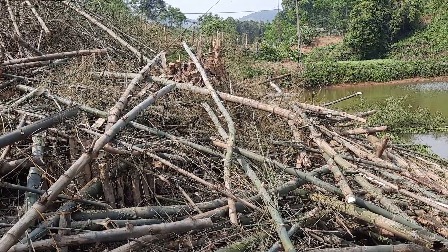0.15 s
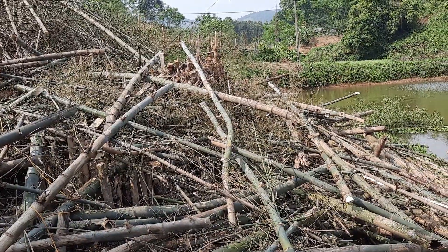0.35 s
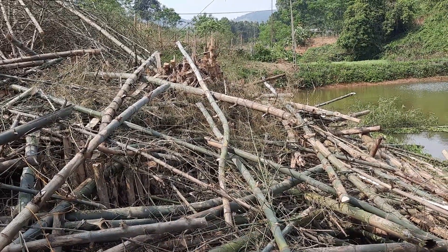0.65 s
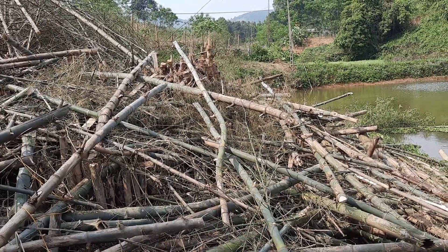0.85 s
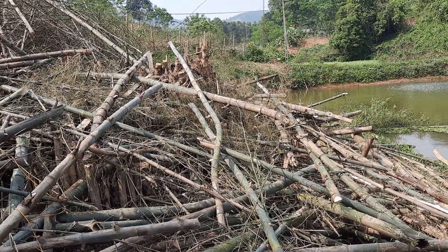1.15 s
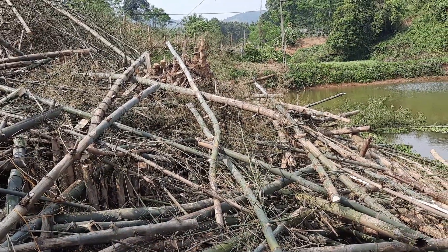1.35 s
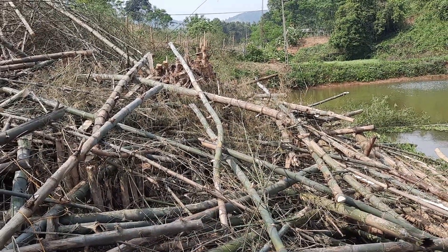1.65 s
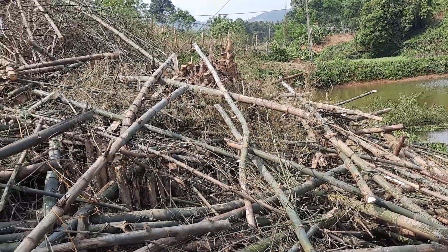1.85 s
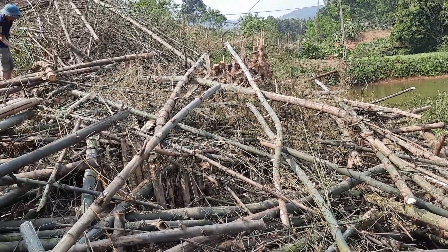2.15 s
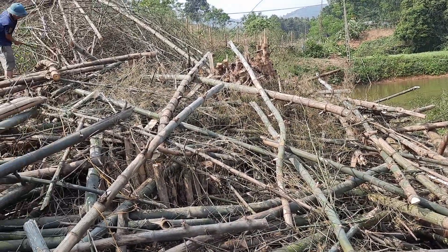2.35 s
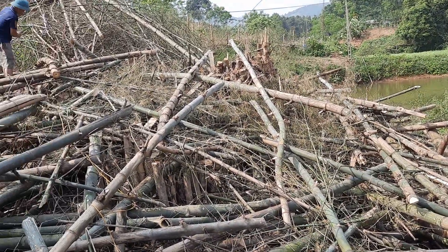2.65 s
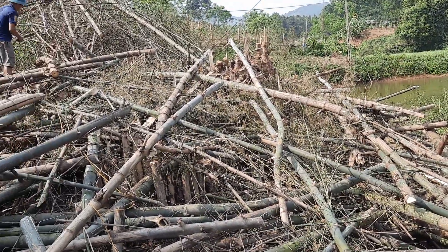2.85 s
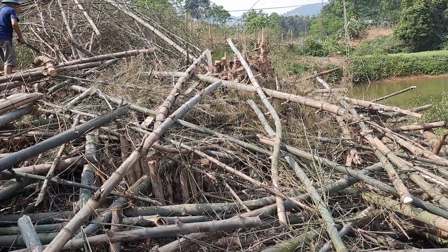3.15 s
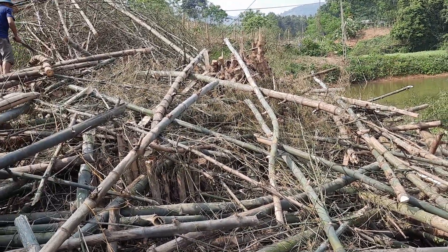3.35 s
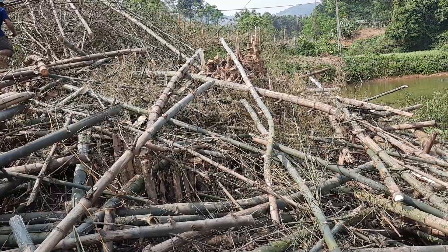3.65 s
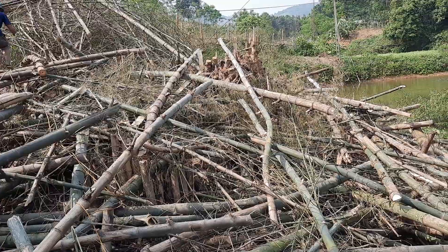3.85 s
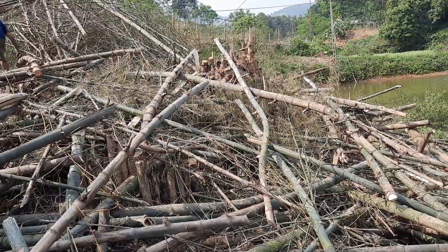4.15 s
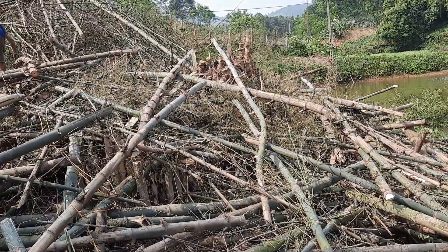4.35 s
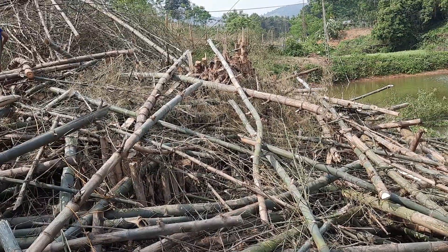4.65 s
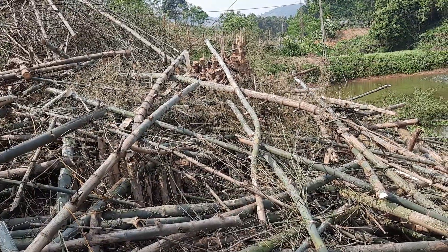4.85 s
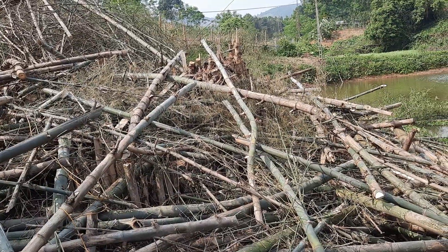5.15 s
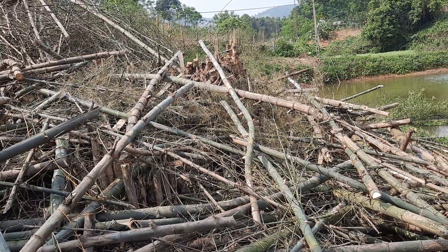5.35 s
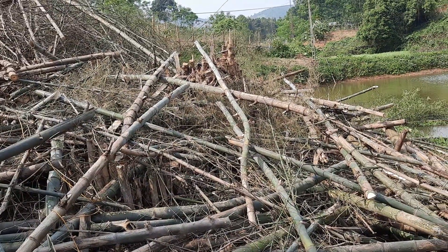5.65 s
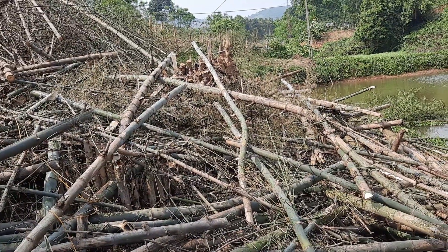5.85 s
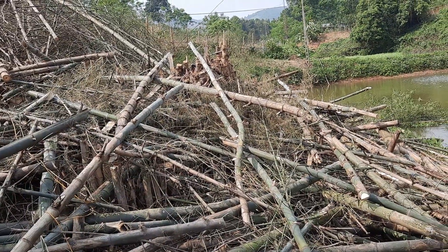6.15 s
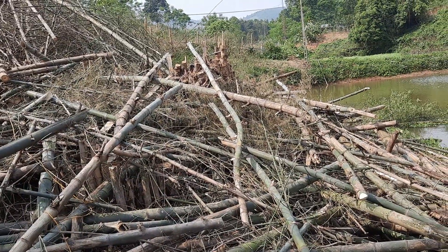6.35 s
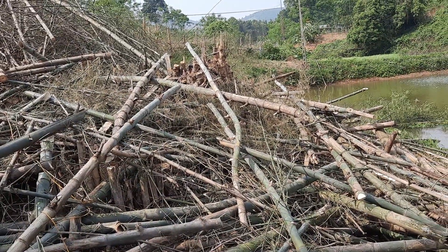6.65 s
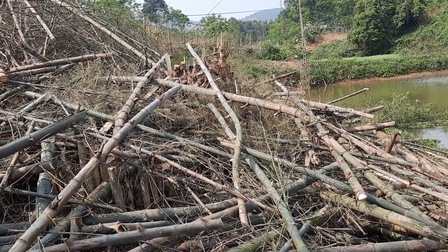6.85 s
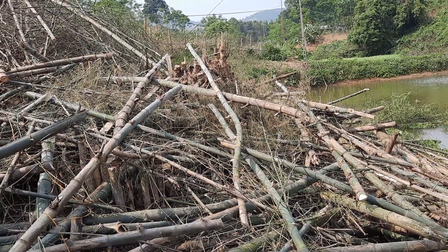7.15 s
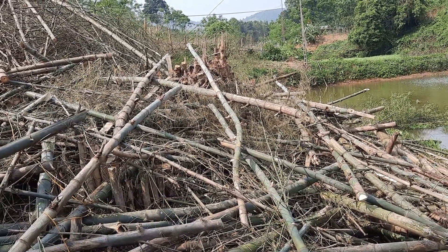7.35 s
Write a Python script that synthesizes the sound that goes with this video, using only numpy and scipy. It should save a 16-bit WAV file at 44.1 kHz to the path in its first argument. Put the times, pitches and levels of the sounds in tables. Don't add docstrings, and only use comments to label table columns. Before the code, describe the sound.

Irregular hacking at hollow bamboo in a dry heap, crisp woody cracks and short clatter, while breeze thumps softly on the microphone.

```python
import sys
import numpy as np
from scipy import signal
from scipy.fft import rfft, irfft, next_fast_len
from scipy.io import wavfile
from scipy.ndimage import uniform_filter1d

SR = 44100
rng = np.random.default_rng(int(sys.argv[2]) if len(sys.argv) > 2 else 0)


def wrap_up_sound(samples):
    columns = np.atleast_2d(samples).T
    tamed = np.clip(columns, -1, 1)
    steps = np.round(tamed * 32767).astype(np.int16)
    wavfile.write(sys.argv[1], SR, steps)


def linear_from_db(decibels):
    return 10 ** (np.asarray(decibels, float) / 20)


N = 331191
TIME = np.arange(N) / SR

# frequency in Hz, spectral density in dB.
FIELD_SPECTRUM = [(40, -15.5), (190, -12.5), (250, -5), (340, -3.5), (480, -3), (750, -7.5), (1300, -6.5),
                  (2200, -1), (4000, -2), (7500, -1.5), (11500, 0.5), (14000, -0.5), (15700, -5.5)]
FIELD_DB = -56.5

# time in seconds, level in dB.
GUST = [(0, -68.5), (0.55, -80), (1.15, -64.5), (1.55, -79.5), (1.88, -61.5), (2.25, -61.5), (2.5, -74),
        (3.0, -56.5), (3.4, -78.5), (3.75, -80.5), (4.15, -73.5), (4.88, -68.5), (5.25, -63), (5.75, -80),
        (6.35, -62.5), (6.75, -76.5), (7.15, -58), (7.5, -72.5)]
# centre in seconds, left level in dB, right level in dB,
# half length in ms.
THUMPS = [(0.356, -57.5, -45, 40), (1.847, -45, -34.5, 32.8), (2.187, -54.5, -38, 33),
          (2.322, -46.5, -33, 30.6), (2.36, -40.5, -41.5, 50.7), (2.68, -51.5, -46, 33.6),
          (2.731, -48.5, -47.5, 26.6), (2.78, -40.5, -38, 15.4), (3.277, -50, -49, 36),
          (4.31, -53, -48.5, 15.3), (5.24, -47.5, -49, 31), (5.449, -44.5, -44, 31.6),
          (7.142, -40.5, -36, 21.4)]
# centre in seconds, level in dB, half length in ms.
EDDIES = [(0.31, -47.5, 25), (0.41, -58, 51), (0.751, -45.5, 105.3), (0.978, -54, 24.6), (1.102, -52, 39),
          (1.27, -53, 163), (1.424, -56, 31.4), (1.655, -43, 33.6), (1.696, -37, 37.3), (1.79, -48, 46),
          (1.969, -51.5, 42.3), (2.1, -46.5, 80), (2.38, -32.5, 8.74), (2.845, -45.5, 34.6),
          (2.955, -42, 45.7), (3.125, -44, 11.8), (3.236, -52.5, 79), (3.97, -65.5, 49), (4.439, -49.5, 42),
          (4.57, -56.5, 46), (4.768, -51, 63.6), (5.17, -44, 28), (6.232, -48.5, 67), (7.07, -54, 55),
          (7.19, -53.5, 44), (7.266, -51.5, 41.5), (7.5, -51.5, 16.2)]
# centre in seconds, left level in dB, right level in dB,
# half length in ms.
FLUTTERS = [(0.23, -46, -68, 9.7), (0.435, -55.5, -70, 42), (0.789, -56, -71.5, 41),
            (1.047, -59, -76.5, 21.2), (1.644, -63.5, -77.5, 185), (1.656, -49, -60, 56.8),
            (1.85, -49.5, -54, 16.4), (1.908, -48.5, -71, 9.2), (2.03, -53.5, -80.5, 25.4),
            (2.1, -57, -68, 68), (2.194, -50.5, -54.5, 21), (2.38, -46, -51.5, 25), (2.631, -59, -67, 41),
            (2.66, -50, -50, 201.5), (2.733, -53, -65.5, 10.7), (2.85, -58.5, -63.5, 43),
            (2.933, -50, -52, 11.4), (2.95, -63, -58, 242), (2.98, -62, -69.5, 26.6),
            (4.713, -49.5, -73, 15.8), (4.97, -60.5, -62, 178), (5.445, -53, -49, 19.7),
            (5.948, -69, -58.5, 17.8), (6.69, -52, -72.5, 25.2), (6.833, -57.5, -63, 47.4),
            (7.145, -57.5, -57, 25), (7.197, -54.5, -58.5, 21), (7.31, -55, -71, 28),
            (7.355, -51, -66, 9.7), (7.467, -55, -73.5, 9.1)]
# frequency in Hz, level in dB.
THUMP_SPECTRUM = [(30, -10.5), (62, 0), (85, -1), (130, -7), (190, -16.5), (260, -25), (400, -56.5)]
# frequency in Hz, level in dB.
FLUTTER_SPECTRUM = [(150, -33), (250, -9.5), (320, 4), (410, -1.5), (510, -7), (660, -19.5), (1000, -42.5)]
SHELTER_DB = -26.5
CALM_DB, FLUTTER_DB = -74, -75
FLUTTER_SHARE = 0.468

# time in seconds, jolt of the heap in dB, force on the hollow in dB,
# force on the wall in dB.
BLOWS = [
    (0.071, -35.5, -36.5, -37),
    (1.436, -47, -56.5, -44.5),
    (2.2538, -29, -45, -32),
    (4.218, -56.5, -31.5, -38.5),
    (5.1532, -54, -33, -39),
    (6.1908, -31.5, -33.5, -38),
]
HOLLOW_FADE_DB_S, WALL_FADE_DB_S, JOLT_FADE_DB_S = 160.5, 243.5, 559
RING_LEAD_S = 0.002956
# time in seconds, peak in dB, own ring in Hz,
# edge in dB against the peak.
TEARS = [(0.0717, -19.5, 2647, -19.5), (0.0817, -31, 2570, -32), (0.0946, -26.5, 1760, -34),
         (1.438, -18, 3118, -23), (1.4454, -33.5, 2230, -29.5), (2.2538, -12.5, 3904, -18.5),
         (2.2744, -26.5, 1520, -30), (2.3195, -23, 1997, -19.5), (4.2173, -20.5, 2937, -20),
         (4.2394, -30, 1520, -24.5), (4.261, -36, 1530, -22.5), (5.1537, -19, 2133, -17),
         (5.1713, -22.5, 5700, -33), (5.211, -42.5, 2870, -13.5), (5.2374, -33, 5040, -9.5),
         (5.2581, -38.5, 5820, -24), (6.193, -19, 2340, -21), (6.2044, -23.5, 2950, -22),
         (6.2148, -20, 2400, -31.5), (6.2579, -31, 2390, -21.5)]
# time in seconds, peak in dB, # own
# ring in Hz, wall in dB against the peak, edge in dB against the peak.
TWIGS = [(0.1424, -30.5, 2770, -18.5, -28), (0.166, -27.5, 2350, -37.5, -33.5),
         (0.1673, -33, 4200, -28, -33), (0.176, -32, 2330, -33.5, -29.5), (0.2581, -38, 4110, -23.5, -19),
         (0.2908, -37.5, 5620, -29, -25.5), (1.501, -42, 2690, -25.5, -23), (2.391, -31.5, 6290, -25, -30),
         (4.088, -33, 2924, -29, -25.5), (4.4176, -32.5, 5550, -14.5, -2), (4.474, -43.5, 5900, -17, 3.5),
         (4.482, -42, 5900, -18, -0.5), (4.492, -49.5, 5900, -21, -2.5), (5.1456, -34, 2800, -14, -30),
         (5.3107, -36.5, 3470, -23.5, -25.5), (5.3504, -40, 3330, -10.5, -19.5),
         (5.395, -42, 5120, -24, -20), (5.415, -34.5, 2850, -14, -26.5), (5.432, -32, 2083, -7.5, -27),
         (6.395, -50.5, 2450, -14.5, -14), (7.441, -39, 5000, -24.5, -4), (7.45, -41, 5570, -28, -13.5)]
TWIG_HOLLOW_DB = -28
# frequency in Hz, width in Hz, level in dB.
FIBRE = [
    [(1710, 300, 8.5), (2666, 83, 22), (4200, 1700, 3), (5110, 176, 14.5), (5400, 200, 11.5),
     (7700, 390, -23.5)],
    [(1760, 104, 6.5), (2330, 163, 18), (3050, 290, -19), (4850, 110, 12.5), (5300, 330, 11),
     (6560, 590, 0)],
    [(1500, 81, 11.5), (1910, 510, 4), (4200, 180, -14.5), (4543, 330, 3), (5900, 77, -2), (6710, 600, 0),
     (8197, 570, 1)],
    [(1274, 140, 2.5), (1520, 77, 8.5), (2150, 137, 5.5), (2950, 410, -0.5), (4240, 224, -9.5),
     (5300, 194, 1), (5800, 190, -5.5)],
    [(1723, 240, -4.5), (2073, 109, 13), (2950, 420, -10.5), (3873, 112, 4), (4750, 234, -7.5),
     (5900, 150, 1.5), (7820, 230, 0.5)],
    [(1706, 136, 3.5), (2690, 410, 7), (2806, 133, 8.5), (3860, 79, 6.5), (4696, 456, 3.5),
     (5820, 170, -3.5)],
]
# frequency in Hz, width in Hz, level in dB.
SNAP = [(1260, 1540, -27), (4030, 2680, -9)]
# frequency in Hz, width in Hz, level in dB.
HOLLOW = [(195, 103, -12), (288.1, 59, -2), (347, 86, 0), (436.2, 60, 1), (516.2, 57.5, -6)]
# frequency in Hz, width in Hz, level in dB.
WALL = [(669.3, 69, -9), (775.6, 52.2, -2.5), (907.4, 132.7, -2), (1044.5, 79.5, -2.5)]
# frequency in Hz, width in Hz, level in dB.
EDGE = [(10520, 4000, -12), (12203, 480, -6)]
# frequency in Hz, width in Hz, level in dB.
HEAP = [(1530, 1370, -2.5), (2110, 392, 4.5), (2745, 588, -1), (4200, 930, -3.5), (5620, 1130, -14),
        (7260, 500, -9.5)]
# start in seconds, length in seconds, level in dB,
# hollow in dB against the level, wall in dB against the level.
SLIDES = [(0.105, 0.066, -51, -1, 1), (0.21, 0.178, -56.5, -3, -6.5), (1.447, 0.067, -51, -7.5, -4),
          (2.265, 0.0748, -44.5, -1, -3.5), (2.386, 0.0854, -54, -8.5, -8.5),
          (4.087, 0.058, -56, -20.5, -7.5), (4.227, 0.0625, -49, 11.5, 3), (4.328, 0.24, -60, -3, -3.5),
          (5.175, 0.069, -41.5, 2.5, -3), (5.312, 0.0694, -51.5, -6.5, -1.5), (5.413, 0.0206, -51, -2, -2),
          (5.45, 0.0827, -59, 4, -4.5), (5.699, 0.098, -62, -9, -12.5), (6.205, 0.0673, -43.5, -3.5, -3),
          (6.317, 0.089, -57, -11.5, -11.5), (6.749, 0.177, -61, -6, -3)]
SLIDE_RISE_DB_S, SLIDE_SAG_DB_S, SLIDE_FALL_DB_S = 904, 25, 361.5

# time in seconds, peak in dB, stronger ring in Hz, weaker ring in Hz.
TICKS = [(0.0738, -20, 2537, 5750), (0.0795, -23.5, 3940, 1206), (0.0831, -26, 2740, 5740),
         (0.088, -41, 1400, 2650), (0.0906, -40, 1850, 3210), (0.0956, -30, 2270, 3170),
         (0.0986, -33, 1740, 3080), (0.168, -26.5, 2306, 4100), (0.1704, -32.5, 2360, 4110),
         (0.174, -33, 2500, 3470), (0.1792, -40, 2450, 3700), (1.4347, -37.5, 2450, 4780),
         (1.4388, -22, 3034, 5300), (1.4431, -28, 2220, 5640), (1.4465, -38, 2240, 1210),
         (1.4517, -40, 2150, 3250), (2.252, -20.5, 4200, 2540), (2.2548, -28.5, 3760, 2690),
         (2.2577, -17, 3700, 6830), (2.2616, -24.5, 4170, 1550), (2.264, -24.5, 1410, 3830),
         (2.2723, -30, 1210, 4220), (2.2765, -35, 1210, 3770), (2.281, -28.5, 1210, 2070),
         (2.3234, -37.5, 2020, 2930), (2.3292, -36, 2000, 4110), (2.3911, -35, 3790, 6050),
         (2.3946, -32, 3270, 1660), (4.2168, -31.5, 3260, 5400), (4.2206, -23.5, 2866, 5330),
         (4.2243, -34, 1890, 2820), (4.227, -32.5, 2110, 1210), (4.2407, -41.5, 1490, 2950),
         (4.418, -36.5, 5640, 7200), (4.421, -30, 5670, 4900), (5.1504, -32, 2810, 3850),
         (5.1535, -26.5, 5450, 2135), (5.1567, -28.5, 5770, 3260), (5.1615, -33.5, 2880, 1210),
         (5.167, -28, 1210, 5400), (5.1731, -27, 5710, 3260), (5.1758, -37, 2950, 5840),
         (5.2145, -41.5, 2860, 5470), (5.2252, -36, 2910, 4220), (5.2385, -31.5, 5040, 6200),
         (6.1923, -28, 5620, 2880), (6.1968, -25.5, 2420, 3840), (6.2021, -28, 2330, 4130),
         (6.2045, -21, 2980, 5900), (6.2079, -33.5, 3060, 4590)]
TICK_DB, TICK_WEAK_DB = 3, -3
TICK_CYCLES, TICK_RISE_S = 2.6, .00012
# start in seconds, length in seconds, level in dB, resonance in Hz.
SCRAPES = [(0.175, 0.019, -45.5, 2534), (1.475, 0.0094, -48, 2490), (1.5, 0.00997, -46.5, 2726),
           (2.251, 0.016, -37.5, 1554), (2.261, 0.0169, -35, 958), (2.324, 0.0152, -38.5, 1994),
           (2.441, 0.0283, -54, 2164), (2.469, 0.0284, -52, 1500), (2.487, 0.0173, -61.5, 2910),
           (2.518, 0.0164, -55.5, 2060), (0.162, .008, -45.5, 4200), (0.288, 0.0081, -56, 5970),
           (0.341, .012, -55.5, 3750), (0.381, 0.044, -64.5, 2624), (4.419, .01, -52, 5800),
           (5.413, 0.0152, -43, 960), (5.164, 0.028, -38.5, 903), (6.302, 0.049, -60, 1595),
           (0.095, .01, -41, 1677), (5.18, 0.041, -47.5, 566.3), (4.271, 0.0282, -59.5, 6310),
           (0.083, .012, -41.5, 400.5), (1.436, 0.0274, -45, 857), (2.285, .02, -46.5, 631),
           (5.206, 0.023, -46.5, 7740), (4.227, .02, -38.5, 917), (4.232, .013, -53, 2990),
           (4.433, 0.0125, -50.5, 5600), (4.473, 0.031, -57, 5900), (5.157, 0.0109, -40, 2880),
           (5.215, 0.016, -52, 2890), (5.315, 0.0279, -54.5, 951), (5.394, 0.0185, -53.5, 5160),
           (5.424, 0.0183, -43, 1690), (6.19, 0.019, -42, 519.4), (6.272, 0.023, -53.5, 5400),
           (6.398, 0.0374, -57.5, 2434), (6.441, 0.0224, -58.5, 2520), (7.418, 0.0121, -59, 2394),
           (7.437, .006, -48.5, 5030), (7.438, 0.0083, -57.5, 3120), (7.445, .014, -50, 5210),
           (7.448, 0.0092, -59.5, 5850)]
SCRAPE_WIDTH = 0.0535

# time in seconds, level in dB.
DRONE = [(5.9, -100), (6.4, -81), (7.5, -81)]
DRONE_HZ = 219
# time in seconds, pitch in Hz, level in dB.
BIRD = [
    (6.745, 1545, -88),
    (6.758, 1555, -68),
    (6.775, 1565, -70),
    (6.79, 1565, -82),
    (6.803, 1575, -69),
    (6.87, 1580, -74),
    (6.89, 1580, -88),
]

PORT_LAG = 14
# frequency in Hz, level in dB.
SHADOW = [(300, 0.5), (700, -8), (1600, 0), (3500, 0)]
# frequency in Hz, level in dB.
RIGHT_PORT = [(300, -1.5), (650, 6), (1200, 3), (1700, 2.5), (2200, -2.5), (2800, -2), (4500, 0), (6500, 1),
              (7800, 2.5), (9700, -26), (12000, -6.5), (15000, -12)]


def unit(x):
    return x / np.sqrt(np.mean(x ** 2, axis=-1, keepdims=True))


def colour(x, points):
    hz, db = np.transpose(points)
    size = next_fast_len(N + 4096)
    bins = np.arange(size // 2 + 1) * SR / size + 1
    gain = linear_from_db(np.interp(np.log(bins), np.log(hz), db))
    return irfft(rfft(x, size) * gain, size)[..., :N]


def ring(x, modes):
    out, power = 0, 0
    for k, (hz, width, db) in enumerate(modes):
        width = max(width, 20)
        b, a = signal.iirpeak(hz, hz / width, SR)
        out = out + (-1) ** k * linear_from_db(db) * signal.lfilter(b, a, x)
        power += linear_from_db(db) ** 2 * np.pi * width / SR
    return out / np.sqrt(power)


def walk(rate):
    fine = 8
    steps = rng.standard_normal((2, int(N / SR * rate) + 2))
    steps = np.repeat(steps, fine, axis=1)
    smooth = unit(uniform_filter1d(uniform_filter1d(steps, fine), fine))
    return np.array([np.interp(TIME * rate * fine, np.arange(len(row)), row) for row in smooth])


def grit(size, spread_db, alike):
    snap_db = spread_db * np.minimum(rng.exponential(size=size), 4.5)
    snaps = rng.standard_normal((3, size)) * linear_from_db(snap_db)
    alike = np.clip(alike, 0, 1)
    return unit(np.sqrt(alike) * snaps[0] + np.sqrt(1 - alike) * snaps[1:])


def at_ports(left, right):
    return np.array([left, colour(np.roll(right, PORT_LAG), SHADOW)])


def field():
    noise = rng.standard_normal((3, N))
    shared = np.array([noise[0], np.roll(noise[0], PORT_LAG)])
    hiss = unit(colour(noise[1:] + 0.307 * shared, FIELD_SPECTRUM))
    return hiss * linear_from_db(FIELD_DB + 0.059 * walk(6.43)[0] + 0.034 * walk(22))


def buffets(puffs, breeze_db, spectrum, rough_db):
    eddies = unit(colour(rng.standard_normal((2, 2, N)), spectrum))
    out = eddies[0] * linear_from_db(breeze_db + rough_db * walk(30))
    for s, left_db, right_db, ms in puffs:
        half = int(ms * SR / 1000)
        a, b = max(int(s * SR) - half, 0), min(int(s * SR) + half, N)
        bell = np.hanning(b - a)
        puff = unit(eddies[1, :, a:b] * bell) * np.sqrt(np.mean(bell ** 2))
        out[:, a:b] += linear_from_db(np.array([[left_db], [right_db]])) * puff
    return out


def wind():
    gust_db = np.interp(TIME, *np.transpose(GUST))
    deep = THUMPS + [(s, db + SHELTER_DB, db, ms) for s, db, ms in EDDIES]
    thumps = buffets(deep, gust_db + np.array([[SHELTER_DB + 15.5], [0]]), THUMP_SPECTRUM, 5.1)
    flutter_db = FLUTTER_DB + FLUTTER_SHARE * (gust_db - CALM_DB)
    return thumps + buffets(FLUTTERS, flutter_db, FLUTTER_SPECTRUM, 4.32)


def crack_rows():
    rows = [(s, db, hz, TWIG_HOLLOW_DB, wall_db, edge_db) for s, db, hz, wall_db, edge_db in TWIGS]
    for s, db, hz, edge_db in TEARS:
        start, _, hollow_db, wall_db = min(BLOWS, key=lambda blow: abs(blow[0] - s))
        late = max(s - start, 0)
        hollow_db = hollow_db - HOLLOW_FADE_DB_S * late - db
        wall_db = wall_db - WALL_FADE_DB_S * late - db
        rows.append((s, db, hz, hollow_db, wall_db, edge_db))
    return rows


def cracks(force):
    own = np.zeros((2, N))
    lead = 400
    onset = (np.arange(4000) - lead) / SR
    for s, db, hz, hollow_db, wall_db, edge_db in crack_rows():
        strength = np.clip((db + 31) / 30, 0, 1)
        bite = 0.513 * np.exp(np.minimum(onset, 0) / (0.00056 + 0.0064 * strength))
        tearing = np.exp(-onset / (0.0044 + .001 * strength))
        shape = np.where(onset < 0, bite, tearing)
        burst = grit(len(onset), 2.83, 0.366) * shape
        burst *= np.sqrt(np.sum(shape ** 2) / np.sum(burst ** 2, axis=1, keepdims=True))
        burst[:, lead] += 5 * np.clip((db + 45.5) / 12, 0, 1)
        i = int(s * SR) - lead
        burst = burst[:, :N - i]
        span = slice(i, i + burst.shape[1])
        twig_db = 5 * (1 - strength)
        gains_db = (-6.5 - twig_db, hollow_db + 2.5, wall_db + 4.0, edge_db - 0.5)
        for layer, gain_db in zip(force, gains_db):
            layer[:, span] += burst * linear_from_db(db + gain_db)
        own[:, span] += ring(burst, [(hz, 0.1106 * hz, 0)]) * linear_from_db(db - 14.5 + twig_db)
    return own


def rattle():
    knocks = grit(N, 2.09, 0.289) * linear_from_db(1.86 * walk(120)[0])
    level = np.full((4, N), 1e-8)
    fade_db = -JOLT_FADE_DB_S * TIME[:SR // 4]
    for s, jolt_db, hollow_db, wall_db in BLOWS:
        i = int((s + 0.0027) * SR)
        peaks_db = [jolt_db, hollow_db - 3.5, wall_db + 2.5, jolt_db - 20]
        level[:, i:i + SR // 4] += linear_from_db(np.add.outer(peaks_db, fade_db))
    for s, length, db, hollow_db, wall_db in SLIDES:
        span = slice(max(int((s - .1) * SR), 0), int((s + length + .3) * SR))
        since = TIME[span] - s
        shape_db = (SLIDE_RISE_DB_S * np.minimum(since, 0) - SLIDE_SAG_DB_S * np.maximum(since, 0)
                    - SLIDE_FALL_DB_S * np.maximum(since - length, 0))
        level[:, span] += linear_from_db(db + np.add.outer([0, hollow_db, wall_db, -17], shape_db))
    return knocks * level[:, None]


def clatter(force, patchy_db):
    _, widths, levels_db = np.transpose(HEAP)
    total = np.sum(linear_from_db(levels_db) ** 2 * widths)
    out = 0
    for hz, width, db in HEAP:
        share = linear_from_db(db) * np.sqrt(width / total)
        out = out + share * ring(force, [(hz, width, 0)]) * linear_from_db(patchy_db * walk(70)[0])
    return out


def early_alike(force):
    alike = 0.818 * force.mean(axis=0) + .5 * force
    return np.roll(alike, -int(RING_LEAD_S * SR), axis=1)


def chopping():
    heap, hollow, wall, edge = rattle()
    fibre = heap / 2
    own = cracks([fibre, hollow, wall, edge])
    edges = [0] + [int((blow[0] - .025) * SR) for blow in BLOWS[1:]] + [N]
    bright = [ring(fibre[:, a:b], modes + SNAP) for a, b, modes in zip(edges, edges[1:], FIBRE)]
    hollow_band = signal.butter(2, [170, 650], "bandpass", fs=SR, output="sos")
    wall_band = signal.butter(2, [600, 1300], "bandpass", fs=SR, output="sos")
    edge_band = signal.butter(3, 7500, "highpass", fs=SR, output="sos")
    hollow = signal.sosfilt(hollow_band, ring(early_alike(hollow), HOLLOW))
    wall = signal.sosfilt(wall_band, ring(early_alike(wall), WALL))
    edge = signal.sosfilt(edge_band, ring(edge, EDGE))
    left, right = np.hstack(bright) + linear_from_db(-3) * clatter(heap, 1.68) + own + hollow + wall + edge
    return at_ports(left, right)


def ticks():
    out, since = np.zeros(N), TIME[:600]
    rise = 1 - np.exp(-since / TICK_RISE_S)
    for (s, db, hz, weak_hz), sign in zip(TICKS, rng.choice([-1, 1], (len(TICKS), 2))):
        i = int(s * SR)
        for ring_hz, ring_db, way in zip((hz, weak_hz), (0, TICK_WEAK_DB), sign):
            fade = np.exp(-since * np.sqrt(ring_hz * 3000) / TICK_CYCLES)
            tone = np.sin(2 * np.pi * ring_hz * since)
            out[i:i + len(since)] += way * linear_from_db(db + ring_db + TICK_DB) * rise * fade * tone
    return out


def scrapes():
    out = np.zeros(N)
    for (s, length, db, hz), rub in zip(SCRAPES, rng.standard_normal((len(SCRAPES), 4000))):
        bell = np.hanning(min(int(1.4 * length * SR), len(rub))) ** .5
        squeak = unit(ring(rub, [(hz, SCRAPE_WIDTH * hz, 0)])[-len(bell):]) * bell
        i = int((s - .2 * length) * SR)
        out[i:i + len(bell)] += linear_from_db(db) * squeak
    return out


def splinters():
    source = ticks() + scrapes()
    return at_ports(source, source)


def drone():
    wander = walk(11)
    phase = 2 * np.pi * np.cumsum(DRONE_HZ * (1 + 0.03 * wander[0])) / SR
    level_db = np.interp(TIME, *np.transpose(DRONE), left=-200)
    return np.sin(phase) * linear_from_db(level_db + 5.27 * wander[1])


def bird():
    s, hz, db = np.transpose(BIRD)
    phase = 2 * np.pi * np.cumsum(np.interp(TIME, s, hz) + 14 * walk(60)[0]) / SR
    level_db = np.interp(TIME, s, db, left=-200, right=-200)
    return np.sqrt(2) * np.sin(phase) * linear_from_db(level_db + 2.2 * walk(80)[0])


def scene():
    gusts = wind()
    left, right = field() + chopping() + splinters() + drone() + bird()
    return np.array([left, colour(right, RIGHT_PORT)]) + gusts


def roll_off(x):
    return signal.sosfilt(signal.butter(12, 16470, fs=SR, output="sos"), x)


def record(dry):
    low_cut = signal.butter(3, 42, "highpass", fs=SR, output="sos")
    top_cut = signal.ellip(10, .5, 60, 15830, fs=SR, output="sos")
    mix = signal.sosfilt(np.vstack([low_cut, top_cut]), dry)
    return roll_off(mix)


dry = scene()
out = record(dry)
wrap_up_sound(out)
```